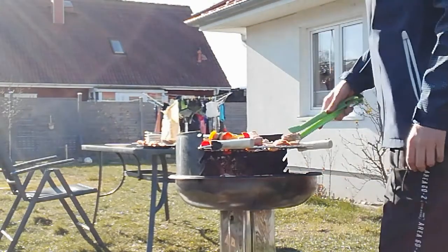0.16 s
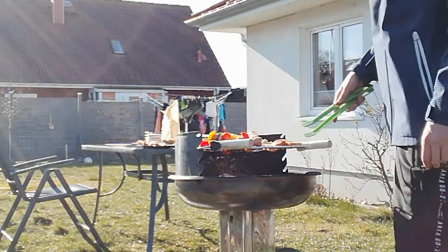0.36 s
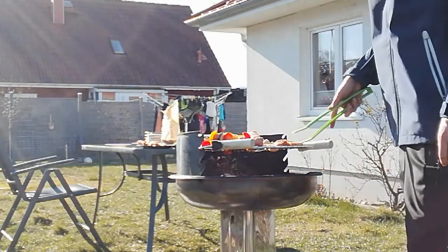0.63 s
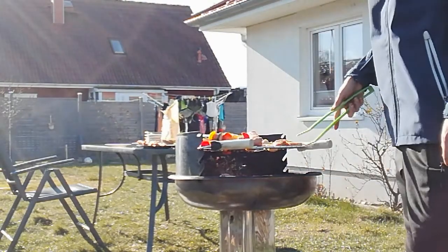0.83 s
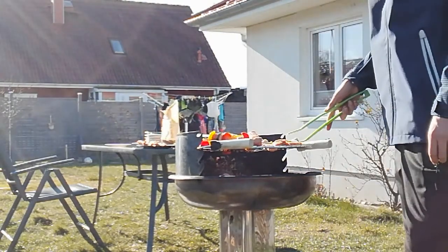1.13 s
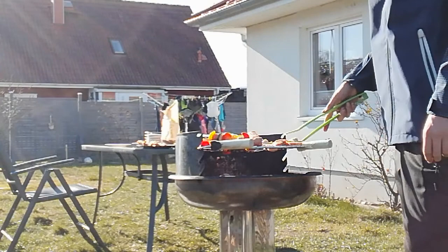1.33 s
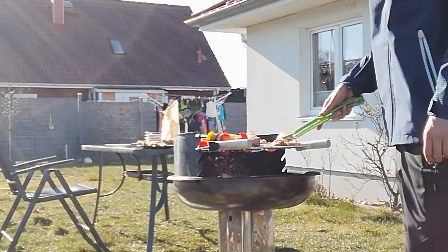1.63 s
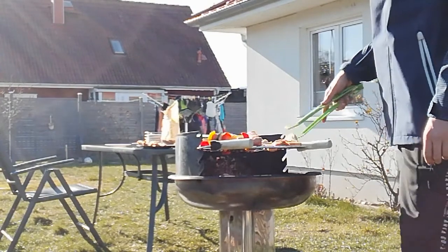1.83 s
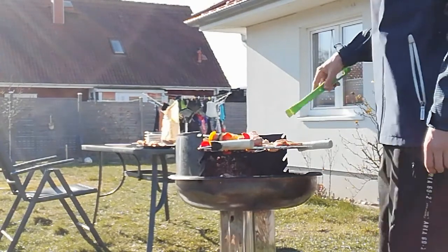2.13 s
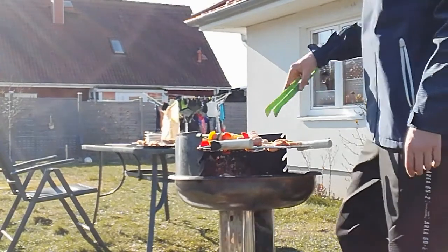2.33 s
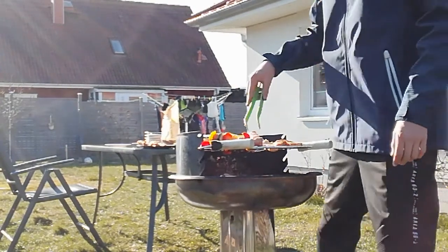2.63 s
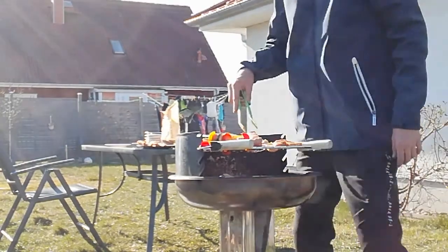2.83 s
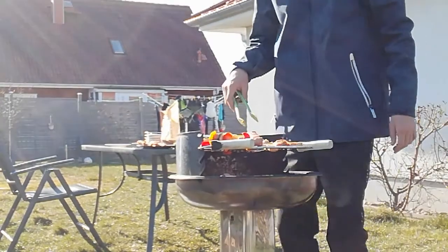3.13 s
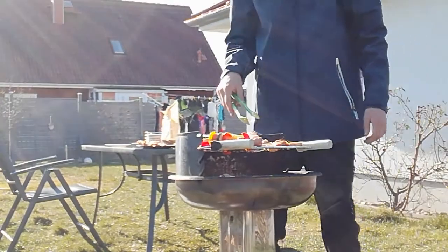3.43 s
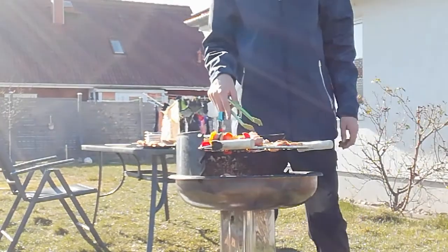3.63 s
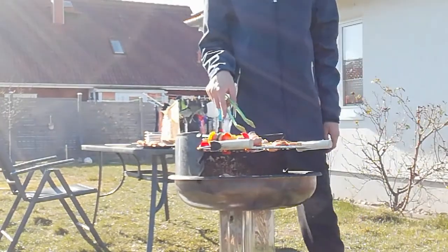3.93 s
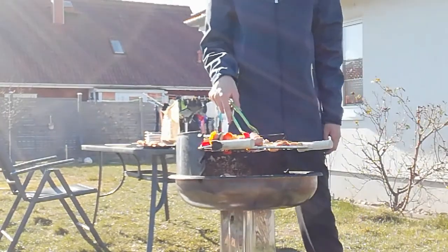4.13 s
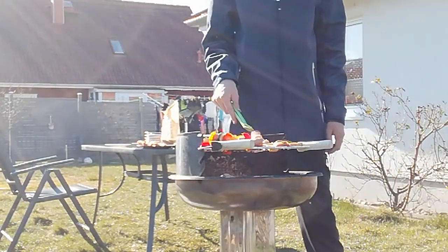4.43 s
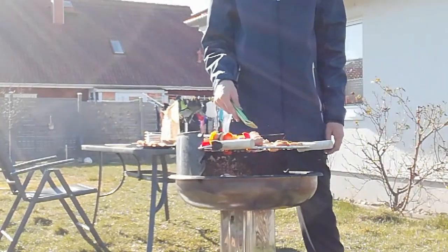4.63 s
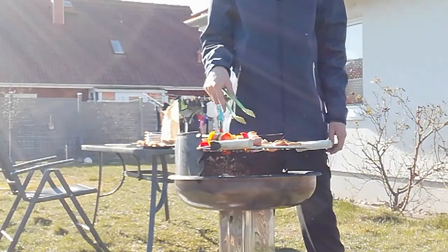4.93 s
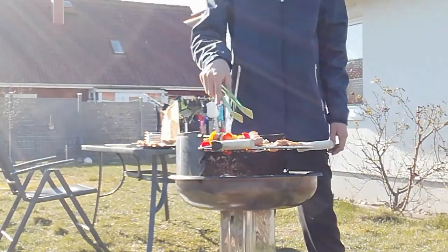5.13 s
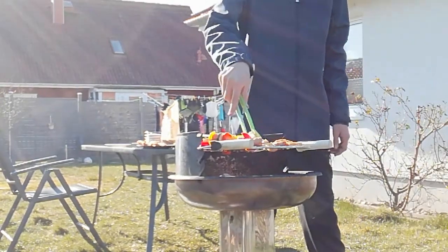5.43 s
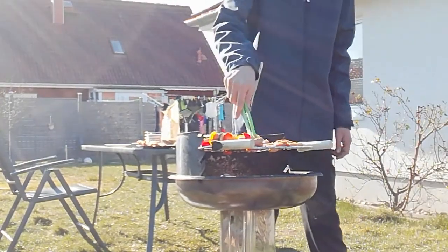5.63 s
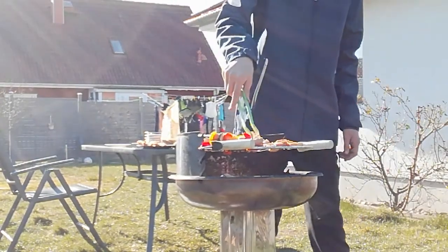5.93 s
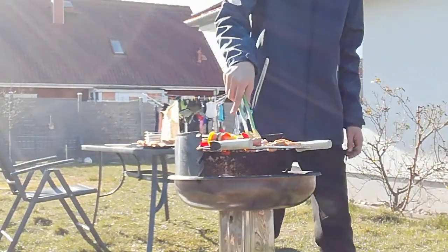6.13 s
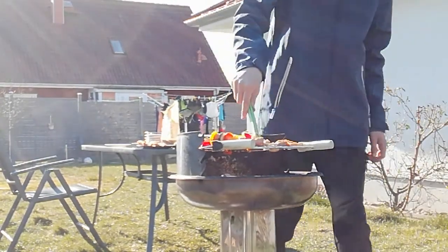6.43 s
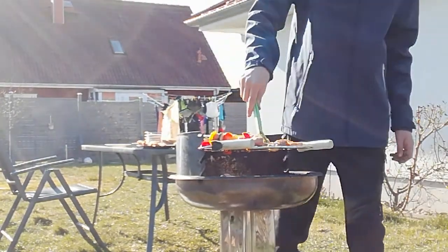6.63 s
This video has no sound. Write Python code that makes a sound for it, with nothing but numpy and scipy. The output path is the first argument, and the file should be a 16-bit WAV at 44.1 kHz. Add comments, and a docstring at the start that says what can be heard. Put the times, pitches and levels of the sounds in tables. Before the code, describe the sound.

A faint, thin sizzle of food on a charcoal grill runs throughout, over soft, distant tyre roar and rumble. A quiet, low engine drone swells and fades in the first two seconds. Metal tongs tick lightly near 1 second. From 1.2 to 2.6 seconds the microphone is rubbed, with gritty catches and dull knocks at about 1.6, 2.4 and 2.5. The tongs, close and slightly to the right, scrape the grate at 2.3 and click several times before 3. Short, high scrapes follow from 3.1, mixing into a run of sharp, bright clicks between 3.4 and 4.1. The jaws snap together loudly at 4.5 and again near 4.7, ringing briefly. From 4.8 seconds, low gusts of wind increasingly buffet the microphone until the end, near 7. One more click comes at 5.7. A sparrow chirps faintly now and then, most clearly around 5.9.

```python
"""Metal tongs scrape, click and snap on a charcoal grill in a garden, over a faint sizzle of food.
The tips stick and slip on the grate or strike it, and the steel rings briefly in the hand.
Rubs and bumps shake the camera body, with gritty catches among them. Tyres roar far off over
a low rumble, an engine drones for a while and a sparrow chirps in thin, quick glides.
Towards the end, eddies of wind buffet the microphone."""
import sys
import numpy as np
from scipy import signal
from scipy.fft import rfft, irfft, next_fast_len
from scipy.io import wavfile
from scipy.ndimage import uniform_filter1d, map_coordinates

SR = 44100
rng = np.random.default_rng(int(sys.argv[2]) if len(sys.argv) > 2 else 0)


def file_out(sig):
    """Save sig as 16-bit WAV at sys.argv[1]."""
    # one column per channel
    cols = np.atleast_2d(sig).T
    # limit, then scale
    lim = np.clip(cols, -1, 1)
    pcm = np.round(lim * 32767).astype(np.int16)
    wavfile.write(sys.argv[1], SR, pcm)


N = 298943
LEAD_IN_S = 0.0032  # a faint noise lead-in just before each click and clack


def amp(db):
    """Decibels to gain."""
    return 10 ** (np.asarray(db) / 20)


def unit(x):
    """x at rms 1."""
    return x / np.sqrt(np.mean(x ** 2) + 1e-20)


def along(points, hz):
    """Read (frequency [Hz], value) points along a log frequency axis."""
    f, v = np.transpose(points)
    return np.interp(np.log(hz + 1), np.log(f + 1), v)


def curves(rows):
    """Automation lanes: one value per sample for each column after the time."""
    s, *cols = np.transpose(rows)
    return [np.interp(np.arange(N) / SR, s, c) for c in cols]


def wobble(rate):
    """A smooth random curve, rate knots a second."""
    return map_coordinates(rng.standard_normal(int(N * rate / SR) + 4), [np.arange(N) * rate / SR])


def swell(start, length, sag_db, attack_s, release_db_per_s):
    """Envelope of one gesture: attack, an arch whose ends sag below its middle, release."""
    t = np.maximum(np.arange(N) / SR - start, 0)
    sag = (2 * np.minimum(t / length, 1) - 1) ** 2
    release_db = np.minimum(release_db_per_s * np.maximum(t - length, 0), 200)
    return (1 - np.exp(-t / attack_s)) * amp(-sag_db * sag - release_db)


def filtered(x, response):
    """Zero-phase EQ: response gives the gain at each frequency."""
    m = next_fast_len(N + SR // 2)
    return irfft(rfft(x, m) * response(np.fft.rfftfreq(m, 1 / SR)), m)[..., :N]


def coloured(x, spectrum, size=2048):
    """Minimum-phase EQ of unit energy, so nothing rings ahead of a hit."""
    cepstrum = irfft(np.log(amp(along(spectrum, np.fft.rfftfreq(size, 1 / SR))) + 1e-6))
    cepstrum[1:size // 2] *= 2
    cepstrum[size // 2 + 1:] = 0
    kernel = irfft(np.exp(rfft(cepstrum)))
    return signal.fftconvolve(x, kernel[None] / np.linalg.norm(kernel), axes=1)[:, :x.shape[1]]


def spread(pair, side_db):
    """Two unrelated signals as mid and side of a stereo pair."""
    side = pair[1] * amp(side_db)
    return np.array([pair[0] + side, pair[0] - side])


def placed(pair, pan_db):
    """Pan two unrelated signals (positive is left); their mean keeps its level."""
    gains = amp([[pan_db / 2], [-pan_db / 2]])
    return pair * 2 * gains / np.linalg.norm(gains)


def add(out, s, sound):
    """Mix a stereo sound in at time s."""
    part = out[:, max(round(s * SR), 0):][:, :sound.shape[1]]
    part += sound[:, :part.shape[1]]


def rush(spectrum):
    """Two unrelated noises of rms 1 with this spectrum."""
    return unit(filtered(rng.standard_normal((2, N)), lambda hz: amp(along(spectrum, hz))))


def slips(rate, scatter_db):
    """Stick-slip: tiny impacts of uneven size at random times, about rate a second."""
    hits = (rng.random(N) < rate / SR) * amp(scatter_db * rng.standard_normal(N))
    return unit(hits * rng.standard_normal((2, N)))


def shifting(x, depth_db, width_bins, life_frames):
    """Resonances that come and go as a contact point slides."""
    hz, _, z = signal.stft(x, SR, nperseg=512)
    field = rng.standard_normal(z.shape[1:]) + .5 * rng.standard_normal(z.shape)
    field = unit(uniform_filter1d(uniform_filter1d(field, width_bins, 1), life_frames, 2))
    depth = depth_db * np.clip(hz[:, None] / 1500, 0, 1)  # long waves hardly notice where the contact is
    gain = amp(depth * field)
    band_rms = np.sqrt(np.mean(gain ** 2, axis=2, keepdims=True))
    return signal.istft(z * gain / band_rms, nperseg=512)[1][:, :N]


def sine_pair(hz, t):
    """A sine with a random phase in each channel."""
    return np.sin(2 * np.pi * (hz * t + rng.random((2, 1))))


def damped(hz, t60):
    """A unit-energy stereo ring of one mode."""
    t = np.arange(SR // 4) / SR
    ring = amp(-60 * t / t60) * sine_pair(hz, t)
    return ring / np.linalg.norm(ring, axis=1, keepdims=True)


def garden(x):
    """A short diffuse answer from the house and fence."""
    # reverb decay: (frequency [Hz], t60 [s])
    decay_times = [(200, 0.074), (2000, 0.22), (9000, 0.036), (15000, 0.022)]
    hz, t, z = signal.stft(rng.standard_normal((2, SR // 3)), SR, nperseg=256)
    tail = signal.istft(z * amp(-60 * t / along(decay_times, hz)[:, None]), SR, nperseg=256)[1]
    return signal.fftconvolve(x, tail / np.linalg.norm(tail[0]), axes=1)[:, :N]


def traffic():
    """Far tyre roar, its colour drifting as the car passes, over a low rumble that follows its level."""
    # the pass-by: (time [s], relative level [dB], centre of the roar [Hz])
    pass_by = [(0, -52, 1190), (2.05, -44.5, 1210), (2.9, -49, 1027), (3.5, -52, 1115), (3.95, -51.5, 1224),
               (4.25, -51, 1240), (4.47, -57, 1290), (4.62, -60, 1260), (5.3, -59, 1110)]
    # the roar narrows around its centre: (time [s], sharpness [factor on the tyre EQ])
    focus = [(3.3, 1.8), (4.2, 3), (4.7, 1.7)]
    # stereo width of the roar: (time [s], side-to-mid [dB])
    width = [(0, 0.5), (2.9, 5), (3.5, 3), (3.95, -4.5), (5, -2)]
    # tyre noise before sharpening: (frequency [multiple of the centre], level [dB])
    tyre_eq = [(.15, -31), (0.384, -3.5), (.5, -9.5), (.72, -5.5), (.88, -2), (1, -3), (1.18, -3),
               (1.45, -6.5), (2.6, -13.5), (5, -17)]
    # town rumble: (frequency [Hz], level [dB])
    rumble_eq = [(15, -38), (42, 0), (100, -3.5), (260, -9), (360, -20.5), (600, -43), (1200, -89)]
    car_db, centre_hz = curves(pass_by)
    sharpness, = curves(focus)
    hz, t, z = signal.stft(rng.standard_normal((2, N)), SR, nperseg=1024)
    centre, sharp = (np.interp(t, np.arange(N) / SR, c) for c in (centre_hz, sharpness))
    colour = amp(sharp * np.interp(hz[:, None] / centre, *np.transpose(tyre_eq), right=-80))
    roar = signal.istft(z * colour / np.linalg.norm(colour, axis=0), nperseg=1024)[1][:, :N]
    tyres = spread(unit(roar), curves(width)[0]) * amp(car_db - 2 + .9 * wobble(2.42))
    rumble = spread(rush(rumble_eq), side_db=-25) * amp(car_db - 1.5)
    return tyres * amp([[-1.2], [.8]]) + rumble


def engine():
    """A low drone swells and fades, wavering in level and pitch."""
    throttle = swell(start=0.36, length=1.44, sag_db=12, attack_s=0.14, release_db_per_s=62)
    level = amp(-46.5 + 2.37 * wobble(5.35))
    hz = 52 + 2.24 * wobble(8.0)
    return throttle * level * np.sin(2 * np.pi * np.cumsum(hz) / SR)


def sparrow():
    """Thin, quick whistles that arch and trill as they glide, with a garden echo about as loud."""
    # syllables: (time [s], first pitch [Hz], last pitch [Hz], relative level [dB])
    chirps = [(0.379, 4070, 4550, -53.5), (1.972, 4470, 4600, -52.5), (4.863, 4060, 4910, -55),
              (4.892, 3750, 4870, -50), (4.915, 2600, 3520, -53.5), (5.864, 4150, 4800, -48),
              (5.902, 4700, 3670, -50), (5.94, 3190, 4820, -47.5), (5.965, 3070, 3940, -47.5),
              (5.994, 3300, 2830, -54)]
    syllable_s, arch_share, trill_share = .03, .04, .03
    out, progress = np.zeros((2, N)), np.linspace(0, 1, round(syllable_s * SR))
    arch = np.abs(np.sin(np.pi * progress))
    for s, first_hz, last_hz, db in chirps:
        glide = first_hz + (last_hz - first_hz) * progress
        hz = glide * (1 + arch_share * arch + trill_share * wobble(300)[:len(progress)])
        whistle = amp(db) * np.sqrt(arch) * np.sin(2 * np.pi * np.cumsum(hz) / SR)
        add(out, s, np.tile(whistle, (2, 1)))
    return amp(-0.5) * out + amp(-1.0) * garden(out)


def sizzle():
    """A thin sizzling hiss with tiny spits in it; fat flares up on the coals now and then."""
    # thin hiss, coloured by a microphone resonance near 9 kHz: (frequency [Hz], level [dB])
    hiss_eq = [(1200, -7), (2200, -9.5), (4300, -8.5), (5600, -11), (7100, -6), (8800, 2), (9500, -0.5),
               (10800, -13), (16000, -22)]
    # flare-ups: (start [s], length [s], relative level [dB])
    flares = [(0.819, 0.11, -53), (1.937, 0.75, -51.5), (2.632, 1.45, -56), (5.334, 0.3, -59),
              (6.227, 0.48, -61.5)]
    spits = slips(rate=1200, scatter_db=3)
    fizz = rush(hiss_eq) + amp(-3.0) * coloured(spits, hiss_eq)
    steady_power = amp(-61.5) ** 2
    flare_power = sum((amp(db) * swell(s, length, sag_db=8.5, attack_s=0.013, release_db_per_s=71)) ** 2
                      for s, length, db in flares)
    return placed(fizz, pan_db=-2.0) * np.sqrt(steady_power + flare_power) * amp(1.68)


def wind():
    """Eddies buffet the microphone in low lumps; the strongest gusts break into smaller, higher ones."""
    # gusts: (start [s], length [s], relative level [dB])
    gusts = [(4.822, 0.19, -47), (5.072, 0.39, -43), (5.346, 0.22, -39), (5.644, 0.038, -34),
             (5.822, 0.3, -35.5), (6.123, 0.39, -32), (6.573, 0.19, -34)]
    # big eddies: (frequency [Hz], level [dB])
    buffet_eq = [(12, -33), (22, -5.5), (55, 4), (110, -3.5), (200, -30), (400, -44), (1000, -83)]
    # small eddies: (frequency [Hz], level [dB])
    swirl_eq = [(40, -34), (130, 5.5), (230, -7), (330, -24), (500, -35), (1000, -69)]
    gust = np.sqrt(sum((amp(db) * swell(s, length, sag_db=.5, attack_s=.0087, release_db_per_s=84)) ** 2
                       for s, length, db in gusts))
    lumps = spread(unit(rush(buffet_eq) * amp(1.95 * wobble(36))), side_db=-12.0)
    swirl = spread(unit(rush(swirl_eq) * amp(2.5 * wobble(40))), side_db=-8)
    swirl_share = gust / amp(-30.5)
    return gust * (amp(0.5) * lumps + amp(-2.5) * swirl * swirl_share)


def handling():
    """Rubbing and knocks shake the camera body and push its two ports in opposite ways."""
    # rubs: (start [s], length [s], relative level [dB])
    rubs = [(1.221, 0.1, -38), (1.296, 0.18, -36.5), (1.455, 0.14, -36.5), (1.608, 0.043, -27),
            (1.659, 0.17, -43), (1.993, 0.63, -40.5)]
    # the rubbed body: (frequency [Hz], level [dB])
    rub_eq = [(90, -44), (190, 3), (500, -10), (700, -9), (900, -13.5), (1500, -5.5), (2500, -11.5),
              (4800, -13), (6200, -22.5), (8500, -12), (15000, -55)]
    # dull knocks: (time [s], relative level [dB], pitch [Hz], t60 [s], side-to-mid [dB], crack [dB])
    knocks = [(1.615, -19.5, 315, 0.13, -5, -11), (1.615, -31, 698, 0.13, 13, -6),
              (2.439, -15.5, 83.5, 0.018, -9, -23), (2.537, -12, 1620, 0.02, 1, -7),
              (2.54, -26.5, 960, 0.034, 4, 2)]
    # the hard edge of a knock: (frequency [Hz], level [dB])
    crack_eq = [(300, -13.5), (900, -1), (2000, -3), (3300, -11), (6000, -41)]
    knock_attack_s, crack_t60_s = 0.00045, 0.02
    force = shifting(slips(rate=4000, scatter_db=1.5), depth_db=4.5, width_bins=3, life_frames=7)
    rub = coloured(force, rub_eq) * unit(amp(1.1 * wobble(45.32)))
    pressure = sum(amp(db) * swell(s, length, sag_db=8.0, attack_s=0.0094, release_db_per_s=216)
                   for s, length, db in rubs)
    out = spread(rub, side_db=-1.5) * pressure * amp(-4.0)
    t = np.arange(SR // 4) / SR
    for s, db, hz, t60, side_db, crack_db in knocks:
        thud_eq = [(hz / 4, -25), (hz, 0), (hz * 2, -10), (hz * 8, -32)]
        thud = coloured(rng.standard_normal((2, len(t))), thud_eq)
        ring = np.array([np.sin(2 * np.pi * hz * t), np.cos(2 * np.pi * hz * t)])
        envelope = amp(db - 60 * t / t60) * (1 - np.exp(-t / knock_attack_s))
        add(out, s, spread(0.8 * ring + 0.33 * thud, side_db) * envelope)
        crack = coloured(rng.standard_normal((2, len(t))), crack_eq)
        add(out, s, amp(db + crack_db - 60 * t / crack_t60_s) * crack)
    return out * amp([[-2.2], [1.2]])


def crunches():
    """Gritty catches: a run of slips through one narrow resonance that sinks as the contact slides."""
    # catches: (start [s], length [s], starting pitch [Hz], relative level [dB])
    catches = [(1.26, 0.02, 4500, -38), (1.333, 0.061, 4260, -44), (1.479, 0.074, 712, -42.5),
               (1.507, 0.025, 4830, -44.5), (1.511, 0.031, 2580, -49), (1.627, 0.027, 4300, -50),
               (5.764, 0.033, 2810, -50.5)]
    ring_cycles, sink_share = 36, .04
    out, t = np.zeros((2, N)), np.arange(SR // 4) / SR
    grit = slips(rate=900, scatter_db=3)
    for s, length, hz, db in catches:
        pressure = swell(s, length, sag_db=7.2, attack_s=0.0014, release_db_per_s=500)
        drive = (grit * pressure)[:, round(s * SR):][:, :len(t)]
        ring = signal.fftconvolve(drive, damped(hz, ring_cycles / hz), axes=1)[:, :len(t)]
        lag_cycles = np.cumsum(hz * sink_share * np.minimum(t / length, 1)) / SR
        sinking = (signal.hilbert(ring) * np.exp(-2j * np.pi * lag_cycles)).real  # frequency shift
        add(out, s, amp(db) * sinking)
    return placed(out, pan_db=-17.0)


def steel(force, ring_db, max_t60):
    """Contact force heard directly and through the hand-damped modes of the tongs."""
    # bright contact: (frequency [Hz], level [dB])
    rasp_eq = [(1200, -75), (2000, -41), (3400, -21), (4500, -16), (5800, -16.5), (7100, -10), (8000, -1),
               (8600, 3.5), (9500, 0.5), (10400, -7.5), (12100, -11), (15500, -19.5)]
    # modes of the steel: (frequency [Hz], relative level [dB], t60 before damping [s])
    modes = [(6100, -3.5, .15), (7840, 12, 0.074), (8900, 3, 0.3), (9050, -4, 0.083), (9470, 17, 0.043),
             (11000, 0, 0.082), (11630, -3, 0.081)]
    t = np.arange(SR // 4) / SR
    ring = sum(amp(db + rng.normal(0, 5.6, (2, 1)) - 60 * t / min(t60, max_t60)) * sine_pair(hz, t)
               for hz, db, t60 in modes)
    ring /= np.linalg.norm(ring, axis=1, keepdims=True)
    ringing = amp(ring_db) * signal.fftconvolve(force, ring, axes=1)[:, :N]
    return (coloured(force, rasp_eq) + ringing) / np.hypot(1, amp(ring_db))


def scrapes():
    """The tips drag in a chatter of slips and harder catches; one mode sings, pressure adds a grind."""
    # strokes: (start [s], length [s], relative rasp [dB], relative grind [dB],
    #           mid-stroke swell [dB], singing mode [Hz])
    strokes = [(2.226, 0.043, -39.5, -38, 6, 9200), (2.344, 0.14, -16.5, -26.5, 10, 8160),
               (2.539, 0.043, -32, -38.5, 5, 8030), (3.149, 0.069, -21, -55, 6, 7480),
               (3.198, 0.13, -20, -57, 4.5, 8500), (3.356, 0.025, -23, -55, 13.5, 9500),
               (3.454, 0.024, -25.5, -70, 14, 8800), (3.66, 0.084, -21.5, -57, 3.5, 9600)]
    # hard-pressed contact: (frequency [Hz], level [dB])
    grind_eq = [(90, -71), (200, -14.5), (900, 1), (2800, 3.5), (4500, 1.5), (6000, -6), (9000, -25)]
    chatter_db, catch_db, sing_db, grind_fade_db = 1.8, -7, -10, 8
    rasp, grind, sing, t = np.zeros(N), np.zeros(N), np.zeros((2, N)), np.arange(N) / SR
    chatter = slips(rate=12000, scatter_db=0.0) * unit(amp(chatter_db * wobble(140)))
    catches = amp(catch_db) * slips(rate=220, scatter_db=2.5)
    force = shifting(unit(chatter + catches), depth_db=4.5, width_bins=2, life_frames=7)
    for s, length, rasp_db, grind_db, swell_db, sing_hz in strokes:
        # the tips bite at once and lift off quickly
        pressure = swell(s - .001, length, swell_db, attack_s=0.0014, release_db_per_s=377)
        progress = np.clip((t - s) / length, 0, 1)
        rasp += amp(rasp_db) * pressure
        grind += amp(grind_db - grind_fade_db * (progress - .5)) * pressure
        drive = (force * pressure)[:, round(s * SR):][:, :SR // 2]
        note = signal.fftconvolve(drive, damped(sing_hz, t60=0.056), axes=1)
        add(sing, s, amp(rasp_db + sing_db) * note)
    bright = placed(steel(force * rasp, ring_db=-8, max_t60=.12) + sing, pan_db=-9.5)
    low = placed(coloured(force * grind, grind_eq), pan_db=-7.5)
    return amp(1.0) * bright + amp(-0.5) * low


def clicks():
    """After a faint noise lead-in, the tips strike the grate and leave a faint rattle and ring."""
    # contacts: (time [s], relative level [dB], body [dB], treble [dB])
    contacts = [(0.9762, -31, -14.5, 1), (1.073, -34.5, -44, -7), (2.2264, -22.5, -26, -5),
                (2.566, -22, -34, -6), (2.635, -26, -20, -8), (2.7787, -29.5, -12, 1),
                (2.832, -16, -15, -12), (2.8908, -18, -43, -7), (3.357, -30, -38, -8),
                (3.4114, -12.5, -38, 5), (3.4343, -10.5, -51, -6), (3.467, -10.5, -57, -4),
                (3.53, -27.5, -42, -12), (3.7003, -8, -26, -15), (3.751, -14.5, -26, -21),
                (3.8098, -13, -24, -0.5), (3.877, -32.5, -20, -5), (3.9932, -25.5, -42, 0),
                (4.042, -27.5, -41, -5), (4.0733, -16.5, -24, 0), (4.149, -31.5, -26, 2),
                (5.69, -16, -15.5, -5), (5.767, -33.5, -6.5, -5)]
    # the tongs move about the grate: (time [s], left over right [dB])
    pan_path = [(1, 0), (2.7, -11), (3.4, -11.5), (4.1, -12.5), (5.7, -0.5)]
    # body of the arms: (frequency [Hz], level [dB])
    arms_eq = [(900, -84), (1500, -11), (2000, -8), (3300, -7.5), (6600, 7), (11000, -35)]
    attack_s, blow_t60_s = 0.0014, 0.021
    lead_in_db, rattle_db, rattle_t60_s = -26, -19.5, 0.11
    tips, arms, t = np.zeros((2, N)), np.zeros((2, N)), np.arange(SR // 8) / SR
    age = np.maximum(t - LEAD_IN_S, 0)
    decay = amp(-60 * age / blow_t60_s) + amp(rattle_db - 60 * age / rattle_t60_s)
    envelope = decay * (1 - np.exp(-age / attack_s)) + amp(lead_in_db) * (t < LEAD_IN_S)
    burst = lambda pan_db: placed(rng.standard_normal((2, len(t))), pan_db) * envelope
    hz = np.linspace(3000, 16000, 24)
    for s, db, body_db, treble_db in contacts:
        pan_db = np.interp(s, *np.transpose(pan_path))
        # where the tips land decides which resonances speak
        colour = np.c_[hz, rng.normal(0, 3, len(hz)) + np.interp(hz, [10000, 12000], [0, treble_db])]
        start = s - LEAD_IN_S - .001
        add(tips, start, coloured(burst(pan_db) * amp(db), colour))
        add(arms, start, burst(pan_db) * amp(db + body_db))
    return amp(-3.0) * steel(tips, ring_db=-22, max_t60=.3) + amp(5.5) * coloured(arms, arms_eq)


def snaps():
    """The jaws clack together: a brief rising hiss, a hard crack, a hollow note and a thin ring."""
    # clacks: (time [s], relative level [dB], lead-in [dB], hollow [dB], ring [dB], left over right [dB])
    clacks = [(4.531, -8, -12, -22, -17, -6), (4.6554, -12.5, -36, -10, -36, -11.5),
              (4.6732, -19, -8, -16, -35, -6)]
    # crack of the jaws: (frequency [Hz], level [dB])
    jaw_eq = [(900, -57), (2000, -23), (3000, -26), (5100, -9), (5700, -13.5), (6400, -3), (7800, -7),
              (9050, 3), (11000, -25.5), (12800, -19), (15500, -28)]
    # modes of the jaws: (frequency [Hz], relative level [dB], t60 [s])
    jaw_modes = [(5020, -3, 0.062), (6440, -18, 0.36), (8705, -4, .15), (8990, -12, 0.17), (9100, -11, 0.3)]
    attack_s, blow_t60_s, tail_db, tail_t60_s = 0.00033, 0.023, -24, 0.11
    out, t = np.zeros((2, N)), np.arange(SR // 4) / SR
    age = np.maximum(t - LEAD_IN_S, 0)
    onset = 1 - np.exp(-age / attack_s)
    blow = onset * (amp(-60 * age / blow_t60_s) + amp(tail_db - 60 * age / tail_t60_s))
    tone = lambda hz, t60: onset * amp(-60 * age / t60) * sine_pair(hz, t)
    for s, db, lead_in_db, hollow_db, ring_db, pan_db in clacks:
        lead_in = amp(lead_in_db) * (t < LEAD_IN_S) * t / LEAD_IN_S
        crack = coloured(rng.standard_normal((2, len(t))) * (blow + lead_in), jaw_eq)
        # the touching jaws buzz, which roughens their ring
        ring = sum(amp(level) * tone(hz, t60) * wobble(260)[:len(t)] for hz, level, t60 in jaw_modes)
        hollow = amp(hollow_db) * tone(hz=2087, t60=0.014)  # the channel between the arms
        add(out, s - LEAD_IN_S, amp(db) * placed(crack + hollow + amp(ring_db) * ring, pan_db))
    return out


def scene():
    """Tongs in front with a touch of garden reverb, everything else around them."""
    tongs = scrapes() + clicks() + snaps()
    foreground = tongs + amp(-13.5) * garden(tongs) + handling() + crunches()
    return foreground + sizzle() + traffic() + engine() + wind() + sparrow()


def record(dry):
    """A soft clip rounds off the highest peaks, then a steep high cut trims the top."""
    ceiling, top_hz = .9, 15900
    limited = dry / (1 + np.abs(dry / ceiling) ** 6) ** (1 / 6)
    return filtered(limited, lambda hz: np.clip((top_hz - hz) / 300 + .5, 0, 1))


dry = scene()
out = record(dry)
file_out(out)
```